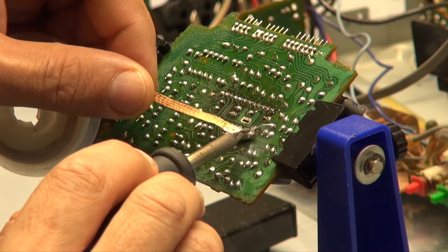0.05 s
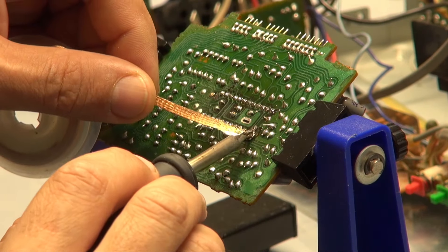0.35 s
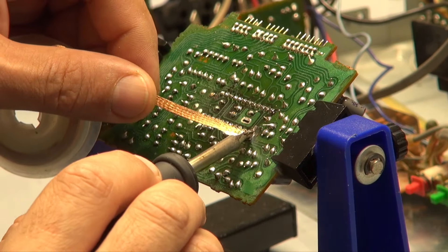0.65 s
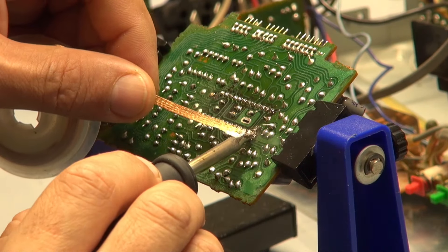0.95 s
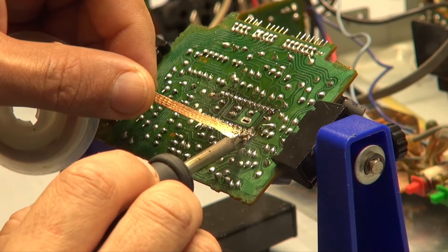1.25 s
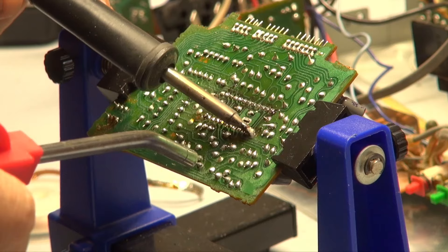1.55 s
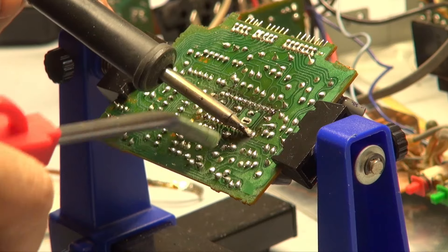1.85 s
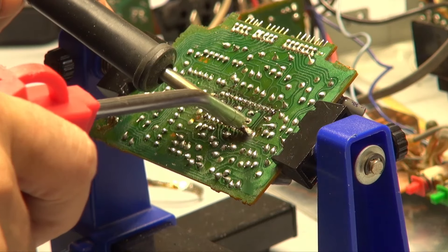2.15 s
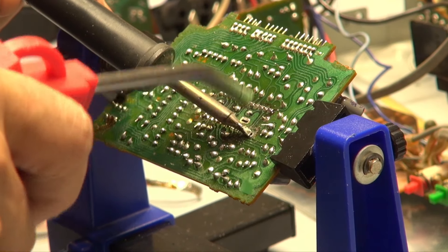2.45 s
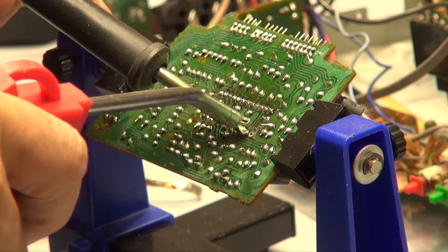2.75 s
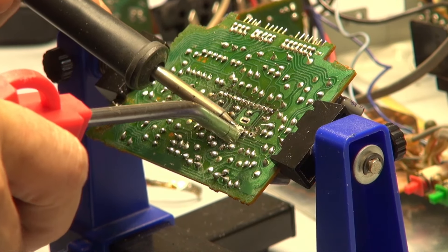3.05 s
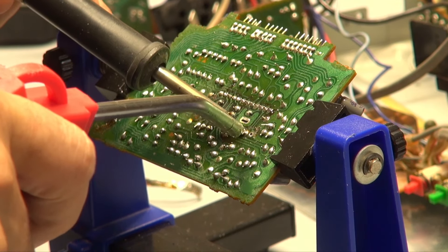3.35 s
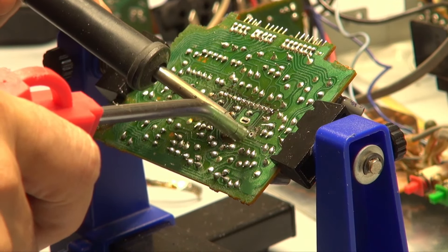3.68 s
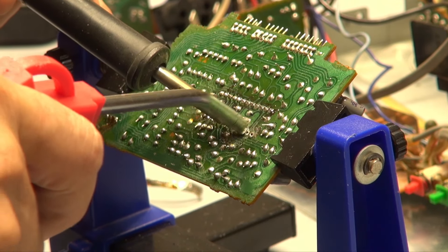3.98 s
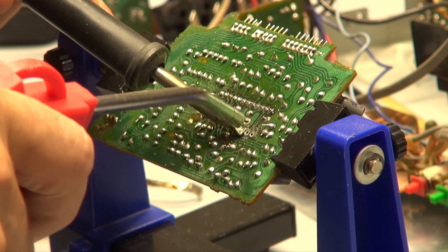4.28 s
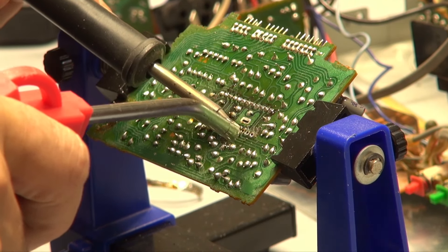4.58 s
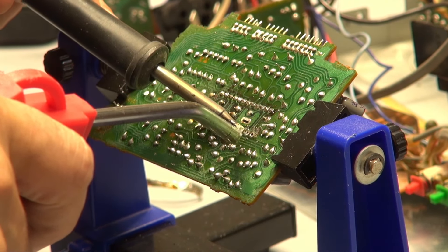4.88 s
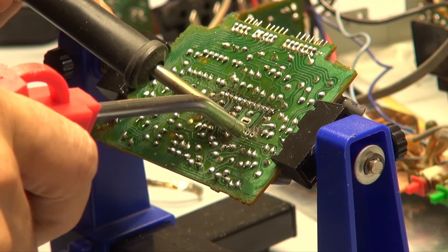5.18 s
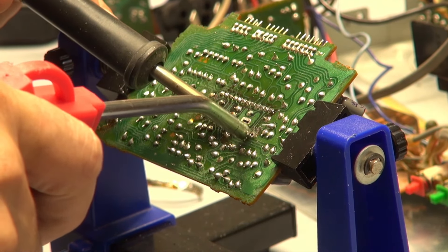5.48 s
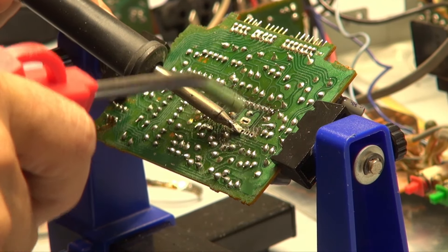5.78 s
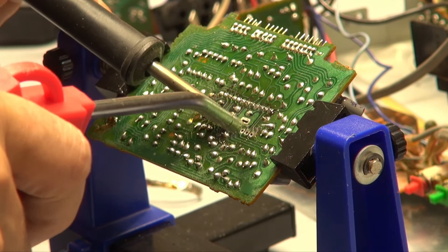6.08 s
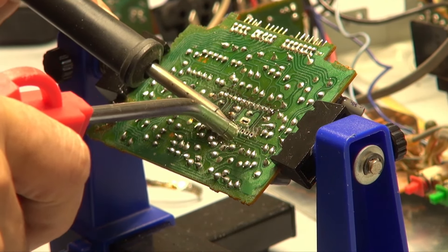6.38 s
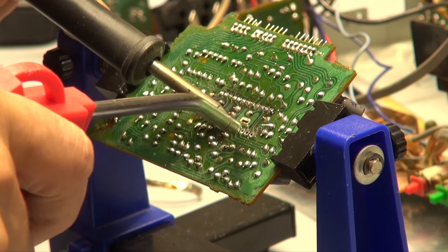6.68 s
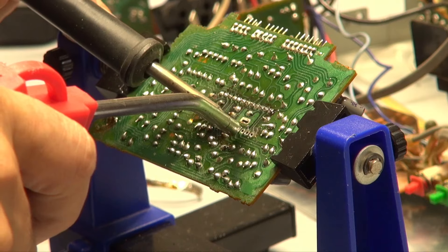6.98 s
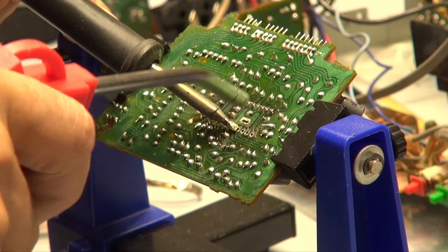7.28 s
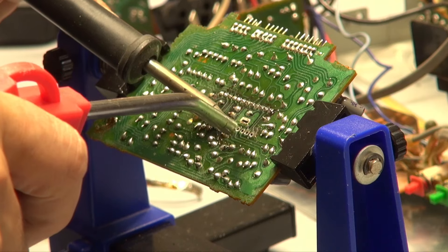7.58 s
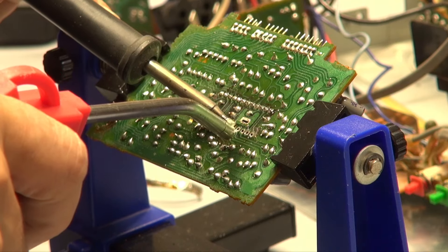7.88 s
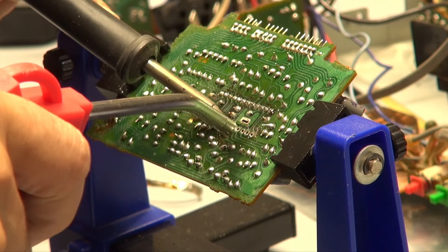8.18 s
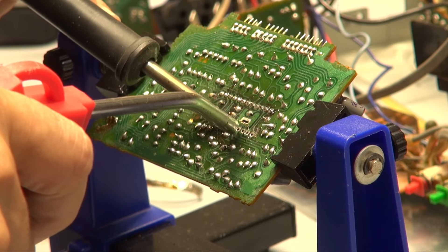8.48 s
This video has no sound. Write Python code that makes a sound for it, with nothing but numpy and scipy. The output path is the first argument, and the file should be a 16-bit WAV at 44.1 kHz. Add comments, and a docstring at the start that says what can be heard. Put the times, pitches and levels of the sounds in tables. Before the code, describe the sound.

Four short, snapping blasts of compressed air hit a circuit board after faint solder sizzling, with light tool ticks over a quiet fan.

```python
"""A compressed-air gun fires four short, snapping blasts at molten solder on a circuit board.
Each jet hisses off the board and dies away in a small room. Before that, copper braid rubs and
sizzles faintly under a soldering iron. Tools tick on the pins and hands bump the bench softly,
over mains hum and a quiet fan. One mono microphone hears it all."""
import sys
import numpy as np
from scipy import signal
from scipy.fft import rfft, irfft, next_fast_len
from scipy.io import wavfile
from scipy.ndimage import map_coordinates

SR = 44100
rng = np.random.default_rng(int(sys.argv[2]) if len(sys.argv) > 2 else 0)


def master(y):
    """Save y as 16-bit WAV."""
    cut = np.clip(np.atleast_2d(y).T, -1, 1)
    pcm = np.round(cut * 32767)  # scale
    wavfile.write(sys.argv[1], SR, pcm.astype(np.int16))


N = 381024

# How long the room rings. Each row: frequency in Hz, seconds to fade by 60 dB.
ROOM_DECAY = [(150, 0.16), (1000, 0.18), (2500, 0.29), (6000, 0.27), (11000, 0.28), (16000, 0.24)]
# Tone of the echo: the jet beams its treble into the room. Each row: frequency in Hz, gain in dB.
ROOM_TONE = [(100, -13.5), (1200, -14), (2000, -10), (3200, -7), (5000, -7.5), (8000, -2.5), (11000, -2.5),
             (12400, -4), (15500, -4.5)]
# The fan's rush of air. Each row: frequency in Hz, relative level in dB.
FAN_TONE = [(12, -31), (20, -0.5), (56, -2.5), (80, -17), (109, 1), (137, -11), (157, -3.5), (238, -10),
            (266, -11.5), (315, -10.5), (686, -11.5), (767, -19), (1130, -15), (4550, -34.5),
            (15500, -40.5)]
# Resonances of the fan's housing. Each row: pitch in Hz, width in Hz, relative level in dB.
FAN_HOUSING = [(289.5, 140, -1.5), (590, 44, -2.5), (655, 60, -4), (892, 26, -3.5), (1110, 34, -7.5),
               (2460, 870, -11.5), (8600, 400, -26.5)]
# Steady tones from the mains and the motor. Each row: pitch in Hz, relative level in dB.
HUM_TONES = [(112, -73.5), (118, -70), (164, -70.5), (237, -71.5), (295, -77.5), (324, -75.5), (403, -78),
             (471, -80), (641, -78), (708, -77), (940, -77.5), (1112, -83), (1174, -83)]
# Hands bumping the bench. Each row: middle in seconds, level in dB, half length in seconds.
HAND_BUMPS = [(.65, -53, .04), (.974, -52, .021), (1.945, -53, .015), (3.784, -49, .035),
              (4.252, -49.5, .02), (4.461, -48.5, 0.019), (6.196, -50.5, .02), (6.301, -48, 0.017),
              (7.45, -42, 0.031), (7.524, -42.5, 0.019), (7.929, -43, .016), (8.06, -54, .08)]
# The soft thud of a hand. Each row: frequency in Hz, relative level in dB.
THUD_TONE = [(15, -10), (35, 0), (75, 0), (120, -10), (250, -35), (1000, -80)]
# The board resonating under the braid. Each row: pitch in Hz, width in Hz, relative level in dB.
RUB_RESONANCES = [(373, 59, 14), (1300, 740, -2.5), (2450, 1000, 0), (3410, 1300, -5.5)]
# Boiling flux, the paste that helps solder flow. Each row: frequency in Hz, relative level in dB.
SIZZLE_TONE = [(300, -19), (2500, 2), (4500, 5), (6500, 0), (8300, 2.5), (11000, -2), (12500, -6),
               (16000, -5.5)]
# Flux spitting under the iron. Each row: start in seconds, level in dB.
FLUX_SPITS = [(.151, -72), (.216, -71), (1.161, -67), (1.196, -70)]
# The fizz of one spit. Each row: frequency in Hz, relative level in dB.
SPIT_TONE = [(1000, -20), (2500, -3), (6500, -9), (10500, -3), (16000, -8)]
# Tools touching the pins and board. Each row: start in seconds, tick level in dB, knock level in dB.
TOOL_TOUCHES = [(1.494, -57, -59), (2.8685, -41, -59), (4.257, -54.5, -52), (4.667, -53.5, -48),
                (6.088, -57, -52), (6.832, -56, -82), (7.842, -60, -72), (7.911, -60, -69)]
# Brief ring of tool tip and pins. Each row: pitch in Hz, relative level in dB, seconds to fade by 60 dB.
TOOL_RING = [(2380, 0, 0.013), (2760, 2, 0.011), (3380, -3, .02), (4300, -2, .012), (6250, 2, 0.0052),
             (7050, -10, .007), (8500, -16, .008), (10500, -7, .007)]
# The crack of a contact or a spit of air. Each row: frequency in Hz, relative level in dB.
CRACK_TONE = [(200, -9.5), (1400, 2), (4000, 0.5), (11000, -7.5), (16000, -12.5)]
# The board resonating when knocked. Each row: pitch in Hz, width in Hz, relative level in dB.
KNOCK_RESONANCES = [(600, 380, 0), (1410, 300, 2), (3000, 570, -9.5)]
# Drops of solder torn off by the jet. Each row: start in seconds, peak level in dB.
SOLDER_DROPS = [(2.259, -13), (2.331, -16), (4.021, -17), (5.752, -19.5)]
# The roar of the churning jet. Each row: frequency in Hz, relative level in dB.
JET_TONE = [(30, -11.5), (100, -3.5), (250, -2), (700, -2.5), (2000, -3), (3500, -5), (5000, -6),
            (6300, -7.5), (9400, -6), (10800, -1.5), (12300, -4), (14300, -1), (16000, -1)]
# Hiss where the jet meets the board. Each row: frequency in Hz, width in Hz, relative level in dB.
HISS_BANDS = [(6220, 440, -4.5), (7990, 360, -4.5), (8930, 490, -6), (10470, 450, -3.5), (11500, 548, -2),
              (13130, 350, -3.5), (13920, 400, -4.5), (15050, 650, -2)]
# Trigger pulls. Each row: start, release, time to open and time to close, all in seconds,
# then pop level in dB, hiss level against the roar in dB, echo gain in dB.
TRIGGER_PULLS = [(2.2296, 2.374, .004, 0.032, -26, -13.5, 1.5), (3.857, 4.02, .0103, .007, -41, -6.5, -0.5),
                 (5.654, 5.757, .008, .023, -35, -7, 0.5), (7.1436, 7.242, 0.0086, .022, -38, -6.5, 0)]


def amp(db):
    """Turn decibels into a gain."""
    return 10 ** (np.asarray(db) / 20)


def unit(x):
    """Scale a signal to an average (rms) level of 1."""
    return x / np.sqrt(np.mean(x ** 2) + 1e-20)


def along(points, hz):
    """Read between the rows of a (Hz, value) table, on a logarithmic frequency scale."""
    freqs, values = np.transpose(points)
    return np.interp(np.log(hz + 1), np.log(freqs + 1), values)


def filtered(x, response):
    """Give each frequency in x the gain response(Hz)."""
    size = next_fast_len(len(x) + SR // 4)
    return irfft(rfft(x, size) * response(np.fft.rfftfreq(size, 1 / SR)), size)[:len(x)]


def noise(tone, size):
    """Noise of level 1, shaped by a tone table."""
    return unit(filtered(rng.standard_normal(size), lambda hz: amp(along(tone, hz))))


def resonant(resonances, size):
    """Noise of level 1 that rings at the given resonances."""
    def response(f):
        return sum((-1) ** k * amp(db) * 1j * f * width / (hz * hz - f * f + 1j * f * width)
                   for k, (hz, width, db) in enumerate(resonances))
    return unit(filtered(rng.standard_normal(size), response))


def wobble(rate, size):
    """A smooth curve through `rate` random values a second."""
    values = rng.standard_normal(int(size * rate / SR) + 4)
    steps = np.arange(len(values) * 8) / 8
    return np.interp(np.arange(size) * rate / SR, steps, map_coordinates(values, [steps]))


def room_echo(x, delay_s=.004):
    """The room answers with a fresh random tail whose frequencies fade at their own speeds."""
    hz, t, spectrum = signal.stft(rng.standard_normal(SR // 2), SR, nperseg=256)
    fade = amp(-60 * t / along(ROOM_DECAY, hz)[:, None])
    tail = signal.istft(spectrum * fade, SR, nperseg=256)[1]
    tail = filtered(tail / np.linalg.norm(tail), lambda f: amp(along(ROOM_TONE, f)))
    return signal.fftconvolve(x, np.pad(tail, (round(delay_s * SR), 0)))[:len(x)]


def fan_and_hum(air_db=-59.5, housing_db=-68):
    """A quiet fan moves air through its housing; the mains and motor hum a little unsteadily."""
    t = np.arange(N) / SR
    air = amp(air_db + 0.68 * wobble(3.4, N)) * noise(FAN_TONE, N)
    housing = amp(housing_db) * resonant(FAN_HOUSING, N)
    hum = np.zeros(N)
    for hz, db in HUM_TONES:
        peak = np.sqrt(2) * amp(db - 1 + 1.3 * wobble(1.4, N))
        hum += peak * np.sin(2 * np.pi * hz * t + 0.77 * wobble(4, N))
    return air + housing + hum


def bench_bumps(sway_hz=43, recoil_lag_s=0.034, recoil_db=-46, recoil_half_s=.026):
    """The bench sways briefly when a hand bumps it, or when the board springs back after a blast."""
    out, t = np.zeros(N), np.arange(-SR // 4, SR // 4) / SR
    recoils = [(release + recoil_lag_s, recoil_db, recoil_half_s) for _, release, *_ in TRIGGER_PULLS]
    for middle, db, half_s in list(HAND_BUMPS) + recoils:
        sway = amp(-1) * np.cos(2 * np.pi * sway_hz * t + .25 * wobble(90, len(t)))
        thud = amp(-8) * noise(THUD_TONE, len(t))
        swell = np.exp(-(t / half_s) ** 2)
        add(out, middle + t[0], amp(db) * swell * (sway + thud))
    return out


def add(track, start_s, sound):
    """Mix a sound into the track at the given time."""
    part = track[round(start_s * SR):][:len(sound)]
    part += sound[:len(part)]


def copper_braid(rub_db=-69, sizzle_db=-74.5, push_s=0.817, push_boost_db=10, lift_s=1.374):
    """Copper braid scrapes the board while its flux boils in a grainy hiss, until the iron lifts."""
    t = np.arange(N) / SR
    pressed = np.exp(-np.maximum(t - lift_s, 0) / .03)
    # one push across the pins: a quick rise and a slower fall
    push = np.exp(-np.abs(t - push_s) / np.where(t < push_s, 0.044, 0.13))
    rub = unit(resonant(RUB_RESONANCES, N) * amp(2 * wobble(90, N) + 1.2 * wobble(7, N)))
    sizzle = unit(noise(SIZZLE_TONE, N) * amp(3 * wobble(500, N) + 1.1 * wobble(35.2, N)))
    return pressed * (amp(rub_db + push_boost_db * push) * rub + amp(sizzle_db) * sizzle)


def flux_spits(rise_s=.006, grain_db=3):
    """A pocket of flux swells quickly, then sputters out in a bright fizz."""
    out, t = np.zeros(N), np.arange(SR // 5) / SR
    for start, db in FLUX_SPITS:
        fizz = unit(noise(SPIT_TONE, len(t)) * amp(grain_db * wobble(500, len(t))))
        swell = np.sqrt(t / rise_s * np.exp(1 - t / rise_s))
        add(out, start, amp(db) * swell * fizz)
    return out


def tool_ticks(firm_db=-52, crack_fade_s=0.013, knock_fade_s=0.037, echo_db=-5):
    """Each touch rings the tool and pins; light ones sound brighter, firm ones knock the board more."""
    out, t = np.zeros(N), np.arange(SR // 3) / SR
    for start, tick_db, knock_db in TOOL_TOUCHES:
        db_per_octave = .22 * (firm_db - knock_db)
        tilt = lambda hz: db_per_octave * np.log2(hz / TOOL_RING[0][0])
        ring = np.zeros(len(t))
        for hz, db, fade_s in TOOL_RING:
            strength = amp(db + tilt(hz) + rng.normal(0, 2) - 60 * t / fade_s)
            ring += strength * np.sin(2 * np.pi * (hz * t + rng.random()))
        crack_tone = [(hz, db + tilt(hz)) for hz, db in CRACK_TONE]
        crack = amp(-13 - 60 * t / crack_fade_s) * noise(crack_tone, len(t))
        knock = amp(knock_db - 60 * t / knock_fade_s) * resonant(KNOCK_RESONANCES, len(t))
        tick = amp(tick_db) * (ring / np.abs(ring).max() + crack) + knock
        add(out, start, tick + amp(echo_db) * room_echo(tick))
    return out


def solder_spatter(width_s=0.00014):
    """Each drop torn off by the jet makes one sharp crack."""
    out, t = np.zeros(N), np.arange(SR // 100) / SR
    for start, db in SOLDER_DROPS:
        add(out, start, amp(db) * (1 - t / width_s) * np.exp(-t / width_s))
    return out


def valve_pops(pop_hz=520, rise_s=0.00072, spit_db=-10):
    """As the valve cracks open, one pressure wave and a spit of air run ahead of the jet."""
    out, t = np.zeros(N), np.arange(SR // 50) / SR
    for start, _, _, _, pop_db, _, _ in TRIGGER_PULLS:
        wave = np.sin(2 * np.pi * pop_hz * t) + amp(spit_db) * noise(CRACK_TONE, len(t))
        swell = t / rise_s * np.exp(1 - t / rise_s)
        add(out, start, amp(pop_db) * swell * wave)
    return out


def air_gun(jet_db=-21.5, flutter_db=0.34, swirl_db=2.0, walls=5, switches_per_s=130):
    """Air roars out at the same pressure on every pull and hisses off the board until the valve shuts."""
    out, t = np.zeros(N), np.arange(SR * 3 // 4) / SR
    for start, release, open_s, close_s, _, hiss_db, echo_db in TRIGGER_PULLS:
        opening = np.clip(t / open_s, 0, 1) ** 3
        closing = np.clip(1 - (t - release + start) / close_s, 0, 1)
        # each band swells by itself as the jet swirls
        hiss = sum(amp(db + swirl_db * wobble(30, len(t))) * resonant([(hz, width, 0)], len(t))
                   for hz, width, db in HISS_BANDS)
        air = unit(noise(JET_TONE, len(t)) + amp(hiss_db) * unit(hiss))
        jet = air * opening * closing * amp(jet_db + flutter_db * wobble(170, len(t)))
        # the deflected jet throws its sound at one wall after another, which smears the echo
        wall = np.floor(t * switches_per_s) % walls
        echo = sum(room_echo(jet * (wall == k)) for k in range(walls))
        add(out, start, jet + amp(echo_db) * echo)
    return out


def scene():
    """All sources at one microphone, the same in both channels."""
    blasts = air_gun() + valve_pops() + solder_spatter()
    handwork = tool_ticks() + bench_bumps() + copper_braid() + flux_spits()
    mono = fan_and_hum() + handwork + blasts
    return np.array([mono, mono])


def record(dry):
    """Cut off the very highest treble."""
    top_hz, slope_width_hz = 15800, 150
    treble_cut = lambda hz: np.clip((top_hz - hz) / slope_width_hz + .5, 0, 1)
    return np.array([filtered(channel, treble_cut) for channel in dry])


dry = scene()
out = record(dry)
master(out)
```